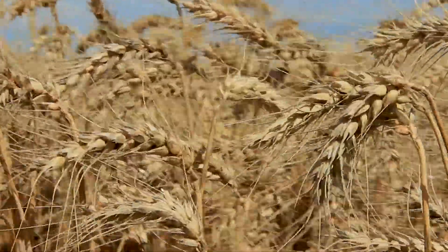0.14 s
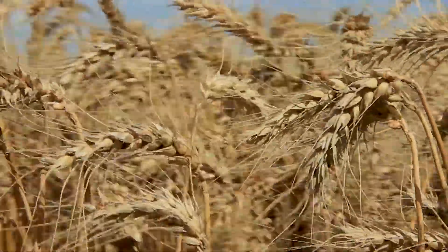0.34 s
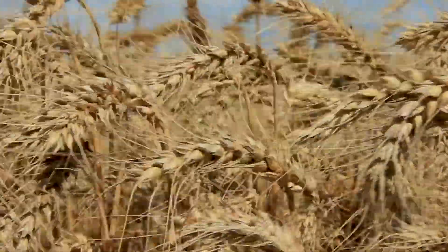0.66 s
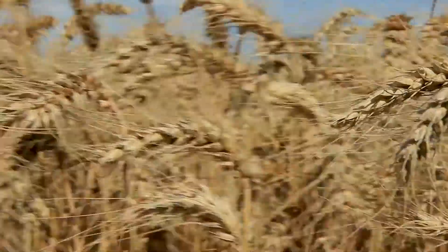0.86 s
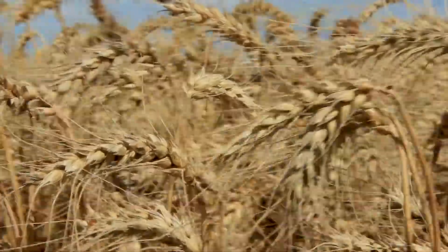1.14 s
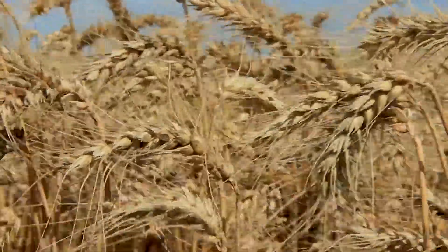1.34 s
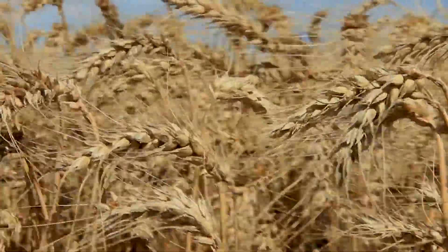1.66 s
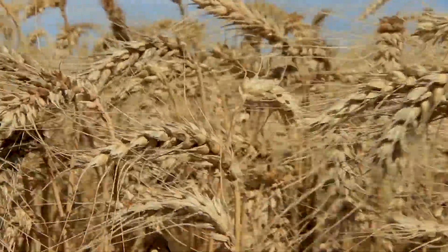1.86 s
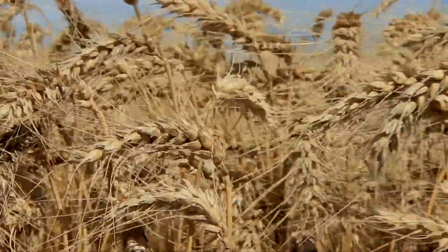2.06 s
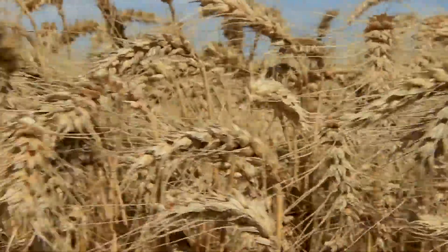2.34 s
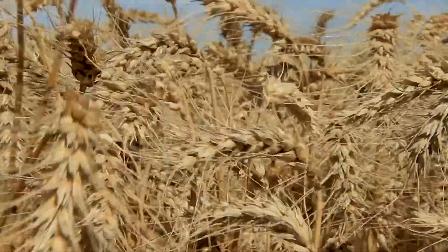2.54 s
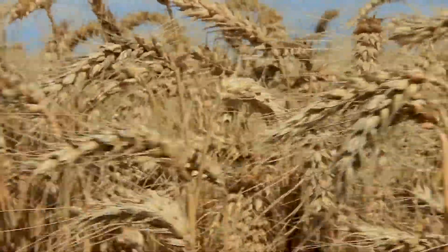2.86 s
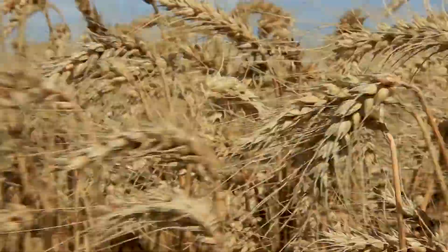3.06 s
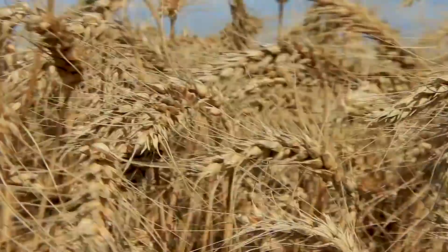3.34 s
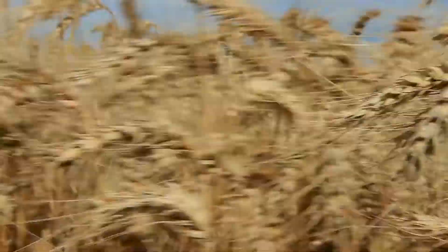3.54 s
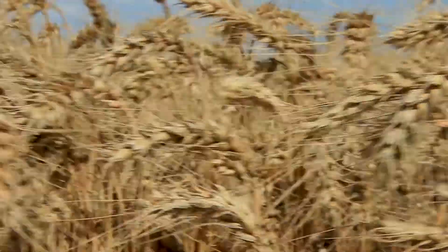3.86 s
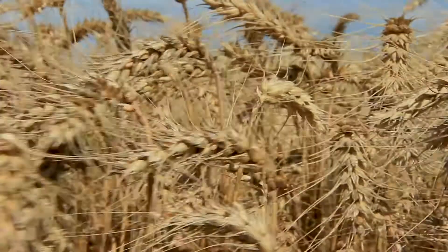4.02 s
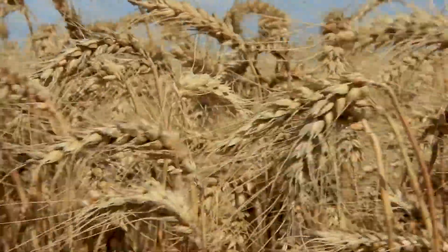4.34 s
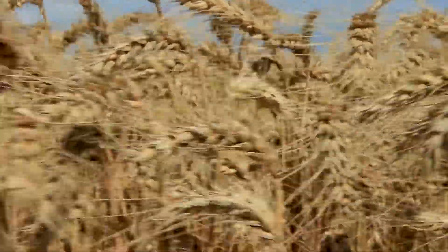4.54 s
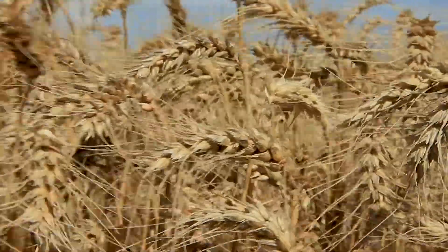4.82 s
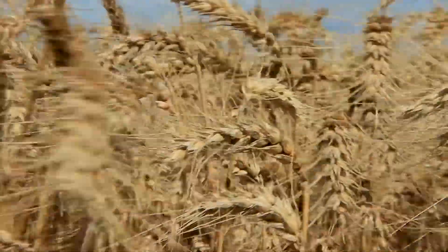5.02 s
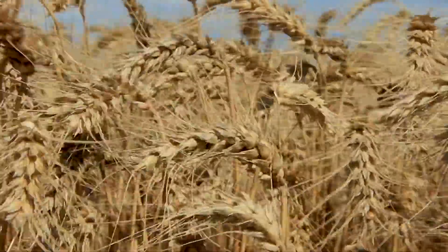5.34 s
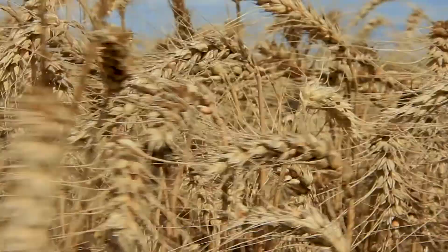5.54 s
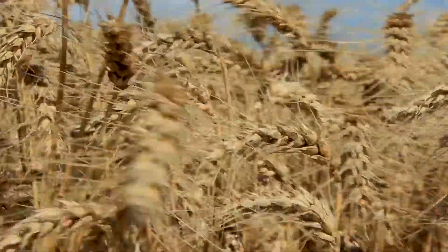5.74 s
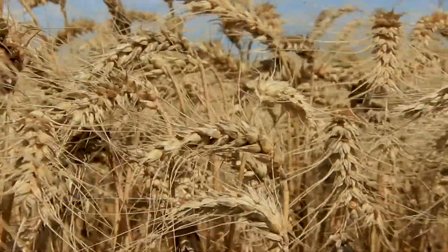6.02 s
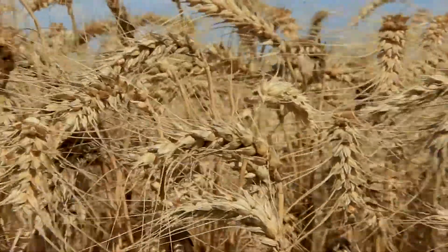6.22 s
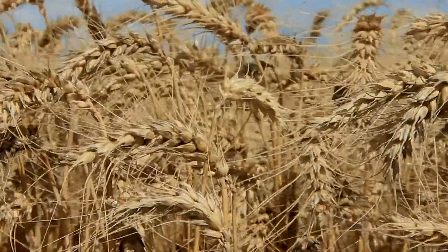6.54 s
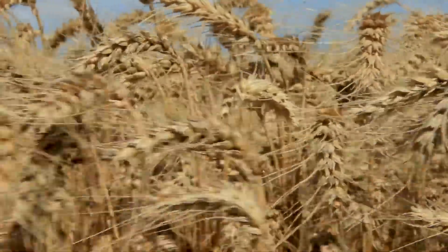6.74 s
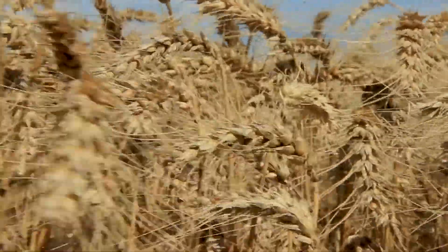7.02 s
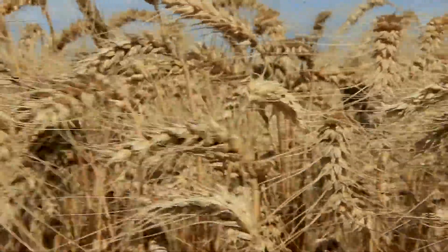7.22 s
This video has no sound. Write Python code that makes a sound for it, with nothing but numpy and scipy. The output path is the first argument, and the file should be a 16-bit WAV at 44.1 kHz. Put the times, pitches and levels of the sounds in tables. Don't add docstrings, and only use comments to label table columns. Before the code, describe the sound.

Bright, fine hiss of countless dry wheat awns swells and fades with gusts above a lumpy low rumble of wind on the microphone.

```python
import sys
import numpy as np
from scipy import signal
from scipy.fft import rfft, irfft, next_fast_len
from scipy.io import wavfile
from scipy.ndimage import uniform_filter1d, map_coordinates

SR = 44100
rng = np.random.default_rng(int(sys.argv[2]) if len(sys.argv) > 2 else 0)


def ratio_of_db(decibels):
    return 10 ** (np.asarray(decibels, float) / 20)


def transcribe(signal):
    frames = np.atleast_2d(signal).T
    limited = np.clip(frames, -1, 1)
    pcm = np.round(limited * 32767).astype(np.int16)
    wavfile.write(sys.argv[1], SR, pcm)


N = 325281


def unit(x):
    return x / np.sqrt(np.mean(x ** 2) + 1e-20)


def curves(rows):
    s, *cols = np.transpose(rows)
    return [np.interp(np.arange(N) / SR, s, c) for c in cols]


def wobble(rate, channels=1):
    at = [np.arange(N) * rate / SR]
    return np.array([map_coordinates(row, at) for row in rng.standard_normal((channels, N // 100))])


def bells(s, half, peaks, edge):
    t = np.arange(0, N, 64) / SR
    shapes = np.exp(-np.abs((t[:, None] - s) / half) ** edge)
    return np.interp(np.arange(N) / SR, t, shapes @ peaks)


def panned(lr_db):
    return ratio_of_db(np.array([lr_db / 2, -lr_db / 2]))


def turbulence(patchy_db, ticks, spread_db, share):
    z = signal.stft(rng.standard_normal((3, N + 512)), nperseg=512)[2]
    field = uniform_filter1d(rng.standard_normal(z.shape[1:]), size=8, axis=0)
    field = uniform_filter1d(field, size=10, axis=1)
    noise = signal.istft(z * ratio_of_db(patchy_db * unit(field)), nperseg=512)[1][:, :N]
    sizes = ratio_of_db(spread_db * rng.exponential(size=(3, N))) * rng.standard_normal((3, N))
    grains = sizes * (rng.random((3, N)) < ticks / SR)
    share = np.clip(share, 0, 1)
    return np.sqrt(1 - share) * noise / np.std(noise) + np.sqrt(share) * grains / np.std(grains)


def at_ports(drive, colour):
    m = next_fast_len(N + 8192)
    f, *cols = np.transpose(colour)
    log_hz = np.log(np.fft.rfftfreq(m, 1 / SR) + 1)
    db, alike, lead, lr_db = (np.interp(log_hz, np.log(f), c) for c in cols)
    alike = np.clip(alike, 0, 1)
    z = rfft(drive, m)
    shared = z[0] * np.exp(.5j * np.array([lead, -lead]))
    pair = np.sqrt(alike) * shared + np.sqrt(1 - alike) * z[1:]
    return unit(irfft(pair * ratio_of_db(db) * panned(lr_db), m)[:, :N])


def evened(pair, seconds):
    power = np.mean(pair ** 2, 0)
    for _ in range(2):
        power = uniform_filter1d(power, int(seconds * SR))
    return unit(pair / np.sqrt(np.abs(power) + 1e-4))


def pings(rows, rise_cycles, fall_cycles):
    out, t = np.zeros((2, N + SR)), np.arange(-SR // 20, SR // 20) / SR
    for s, db, hz, lr_db, lead in rows:
        shape = np.exp(-(t * hz / np.where(t < 0, rise_cycles, fall_cycles)) ** 2)
        wave = np.cos(2 * np.pi * hz * t + np.array([[lead / 2], [-lead / 2]]))
        out[:, round(s * SR):][:, :len(t)] += ratio_of_db(db) * shape * wave * panned(lr_db)[:, None]
    return out[:, SR // 20:][:, :N]


# [t/s, level/dB, brightness of the nearest ears/dB, left-right/dB]
GUST_CURVE = [(0, -31, 4, 1.5), (.13, -30.5, 2, 1.5), (.5, -27, 0, 2.5), (1.0, -30.5, -1, 2),
              (1.23, -32.5, -2, 1.5), (1.38, -35.5, -2.5, 3), (1.97, -36.5, 1, 3.5), (2.3, -34.5, 1.5, 0),
              (2.62, -38, -1, 6), (3.3, -31.5, -2.5, 4), (3.7, -31.5, -1.5, 3), (4.25, -34, -4.5, 2),
              (5.0, -31.5, -2, 3.5), (5.4, -30, 4, 0.5), (5.7, -33, 2, 3), (6.3, -36.5, -3.5, 0.5),
              (6.8, -40.5, -5, 3.5), (7.37, -43, 0, 5)]
USUAL_GUST_DB = -33.5


def gusts():
    return curves(GUST_CURVE)


# [t/s, level over the usual/dB]
AIR_SPEED = [(0, 2), (.55, 1.5), (1.0, 0.5), (1.4, .5), (1.9, 1.5), (2.4, 0.5), (2.9, 2), (3.4, -1),
             (3.9, 1.5), (4.4, 0), (5.1, 3), (5.45, 2.5), (5.75, 1), (6.2, -1.5), (6.6, -2.5), (7.0, -3.5),
             (7.37, -4.5)]


def air_speed():
    return curves(AIR_SPEED)[0]


# [t/s, swell level/dB, half length/s]
EAR_SWAYS = [
    (1.028, 0.5, .06),
    (1.6, 0.2, .1),
    (2.13, 2.5, 0.082),
    (3.38, 0.5, 0.11),
    (3.663, 1, 0.079),
    (4.63, 1.6, .15),
    (5.19, 2.5, .1),
    (5.92, 2.5, 0.14),
    (6.213, 1.5, 0.13),
]


def sways():
    s, db, half = np.transpose(EAR_SWAYS)
    return bells(s, half, db, edge=2.4)


# [t/s, peak level/dB, half length/s, deepest eddies over peak/dB]
AIR_PUFFS = [(0.087, -33.5, 0.11, -7), (0.443, -35, 0.13, -14), (0.701, -29, 0.027, -3.5),
             (0.81, -32, 0.027, -3.5), (0.92, -39, 0.058, -15), (1.142, -34, 0.095, -7),
             (1.605, -29, 0.079, -11), (1.824, -39, 0.084, -18), (2.14, -31, 0.068, -9),
             (2.244, -32, 0.025, -10), (2.382, -36.5, 0.026, -2.5), (2.77, -34.5, 0.067, -6.5),
             (2.907, -32.5, 0.051, -5.5), (3.057, -35, 0.049, -16), (3.31, -32, 0.064, -12),
             (3.43, -28, 0.04, -8), (3.71, -34, 0.13, -14), (4.128, -34, 0.041, -21),
             (4.27, -34, 0.096, -10), (4.58, -30.5, 0.089, -19), (4.844, -33, 0.081, -15),
             (5.186, -31.5, 0.12, -13), (5.54, -29, 0.087, -6), (5.8, -26, 0.042, -17),
             (5.908, -32.5, 0.048, -13), (6.062, -38.5, 0.025, -5.5), (6.265, -34, 0.078, -17),
             (6.54, -34.5, 0.09, -7.5), (7.04, -35.5, 0.07, -7.5), (7.28, -32.5, 0.077, -15)]


def puffs(speed_db):
    s, db, half, deep_db = np.transpose(AIR_PUFFS)
    lull_db = -38.5 + 0.18 * speed_db
    levels = []
    for peak, low in ((db, lull_db), (db + deep_db, lull_db - 12)):
        power = bells(s, half, ratio_of_db(2 * peak), edge=1.9) + ratio_of_db(2 * low)
        levels.append(10 * np.log10(power))
    return levels


# [f/Hz, level/dB, left-right likeness/0-1, left lead/rad, left-right/dB]
DEEP_COLOUR = [(25, -60, .2, 2.5, 0), (60.6, -69, .4, 2.6, -1), (85, -18, 0.23, 1.1, -8),
               (114.4, 1.5, 0.72, 1.7, 0), (156, 2, 0.64, 1.73, 2.5), (196, -16, 1, 0.84, -23),
               (300, -46, 0.89, 1.7, 0)]
BODY_COLOUR = [(80, -54, .5, 5.6, -8), (150, -8.5, 0.6, 2.24, -10), (189.6, -0.5, 0.28, 4.5, 2.5),
               (215, 1, 0.63, 3.52, -3.5), (281, 0.5, 0.2, 5.5, -2), (300, -0.5, 0.57, 3.55, 2.5),
               (387, -4, 0, 3.6, -4), (479, -20.5, 0.45, 3.2, 2), (700, -50, 0.07, 3.4, -5)]
FLUTTER_COLOUR = [(250, -40, .3, 4, 0), (372, -7, 0.31, 4.6, 1), (460, 0, 0.65, 3.05, 0.28),
                  (520, -2, 0.2, 4.2, 0.33), (653, -5.5, 0.81, 3.3, -0.86), (773, -10.5, 0.78, 2.97, -1.8),
                  (920, -24, 0.27, 2.8, -1.1), (1400, -39, .4, 3.3, 0)]


def rumble(lumps, speed_db, level_db, deep_db, puff_db):
    stream = ratio_of_db(0.39 * lumps) * turbulence(patchy_db=0.94, ticks=220, spread_db=3.5, share=0.16)
    deep = evened(at_ports(stream, DEEP_COLOUR), 0.14) * ratio_of_db(deep_db - 1.4)
    body = evened(at_ports(stream, BODY_COLOUR), 0.058) * ratio_of_db(level_db - 0.95)
    flutter = evened(at_ports(stream, FLUTTER_COLOUR), 0.053) * ratio_of_db(-38.5 + 0.66 * puff_db + speed_db)
    edge = signal.sosfiltfilt(signal.butter(2, 650, "high", fs=SR, output="sos"), flutter)
    flutter = flutter + edge * (ratio_of_db(0.67 * speed_db) - 1)
    side_db = 3.2 * wobble(5)[0]
    return (deep + body + flutter) * ratio_of_db(0.95 * lumps) * panned(side_db)


# [f/Hz, level/dB, left-right likeness/0-1, left lead/rad, left-right/dB]
RUSH_COLOUR = [(398, -19, .3, 2.4, 0), (673, 2, 0.23, 2.1, 4.5), (980, -1.5, 0.39, 0.87, -3),
               (1360, -6, 0.54, .5, 1), (1730, -10.5, 0.34, .5, -5.5), (2660, -15, 0.93, 0.46, 4),
               (5000, -55, .4, .5, 0)]


def rush(lumps, speed_db, puff_db):
    gust_db = gusts()[0] - USUAL_GUST_DB
    eddies = at_ports(turbulence(patchy_db=-0.63, ticks=1500, spread_db=-3.5, share=0.078), RUSH_COLOUR)
    rush_db = -44 + 0.062 * puff_db + 0.49 * speed_db + 0.3 * gust_db + 0.36 * sways()
    side_db = -1.7 + 1.6 * wobble(2.96)[0]
    return evened(eddies, 0.42) * ratio_of_db(rush_db + 0.15 * lumps) * panned(side_db)


# [t/s, peak level/dB, f/Hz, left-right/dB, left lead/rad]
SLOW_HEAVES = [
    (.17, -35, 115, -2, 1.7),
    (1.68, -32, 112, -2, 1.7),
    (3.73, -34, 120, -2, 1.7),
    (4.28, -32, 116, -2, 1.7),
    (5.1, -32, 118, -2, 1.7),
    (5.76, -29.5, 113, -2, 1.7),
]


def heaves():
    return pings(SLOW_HEAVES, rise_cycles=2.6, fall_cycles=3.3)


# [t/s, peak level/dB, f/Hz, left-right/dB, left lead/rad]
PORT_THUMPS = [(0.101, -16, 260, -5, 5.6), (0.683, -17, 343, 7, 2.7), (0.955, -22, 250, 9, 2.4),
               (1.8, -16, 216, -5, 2.9), (3.44, -16.5, 215, 5, 4.4), (4.794, -16.5, 246, -0.5, 4.3),
               (5.563, -14, 216, -4, 4.6), (6.052, -22, 204, 2, 4.7), (6.78, -26, 215, 5, 2.7),
               (7.002, -18, 328, -3, 3.4), (7.336, -17.5, 324, -3, 8)]


def thumps():
    return ratio_of_db(-5.0) * pings(PORT_THUMPS, rise_cycles=1.0, fall_cycles=0.99)


def buffet():
    speed_db = air_speed()
    level_db, deep_db = puffs(speed_db)
    puff_db = level_db + 34
    lumps = wobble(26)[0]
    large = rumble(lumps, speed_db, level_db, deep_db, puff_db)
    return large + rush(lumps, speed_db, puff_db) + thumps() + heaves()


# [f/Hz, level/dB, left-right likeness/0-1, left lead/rad, left-right/dB]
STALK_COLOUR = [(497, -16, 0.84, .5, 0), (1280, -1.5, 0.49, 0.37, 0), (2100, -3.5, 0.55, 0.41, 1),
                (3230, 1.5, 0.71, 0.43, 0.89), (4130, -0.5, 1, 0.44, 0), (5400, -4, 0.16, 2.4, 0.18),
                (8070, 4.5, 0.18, 6.8, 0.55), (13700, -24, .2, 7.1, 0)]
HISS_DB = 4


def stalks(gust_db, near_db, wave):
    rustle = at_ports(turbulence(patchy_db=-0.54, ticks=5000, spread_db=1.5, share=0.39), STALK_COLOUR)
    stalk_db = USUAL_GUST_DB + HISS_DB - 11.5 + 0.96 * (gust_db - USUAL_GUST_DB) + 1.07 * sways()
    return rustle * ratio_of_db(stalk_db + 0.3 * near_db + 0.7 * wave + 0.5 * wobble(22))


# [t/s, peak level/dB, f/Hz, left-right/dB, left lead/rad]
HUSK_SNAPS = [
    (7.2913, -30, 8360, 4.0, 0.8),
]


def husk_snap():
    return ratio_of_db(4.0) * pings(HUSK_SNAPS, rise_cycles=4, fall_cycles=11)


# [f/Hz, level/dB, left-right likeness/0-1, left lead/rad, left-right/dB]
TIP_COLOUR = [(7000, -37, .2, 3, 0), (10500, -3, .25, 2, 0), (12500, -7.5, .28, 4.2, -0.076),
              (14000, -2.5, .2, 4.3, -1), (16000, -0.5, .2, 6.4, -1)]


def tips(hiss_db, near_db, wave):
    sizzle = at_ports(turbulence(patchy_db=1.5, ticks=12000, spread_db=2.2, share=.2), TIP_COLOUR)
    return sizzle * ratio_of_db(hiss_db - 2 + near_db + 0.5 * wave + .3 * wobble(20))


# [f/Hz, level/dB, left-right likeness/0-1, left lead/rad, left-right/dB]
AWN_COLOUR = [(2310, -27.5, 0.44, 0.7, 0), (4640, -7.5, 0.032, 3, -0.34), (6460, -6, 0.39, 1.66, 0.56),
              (7720, -3, 0.14, 4.4, 0.59), (9120, 1.5, 0.3, 1.4, 0.6), (10500, 3, 0.21, 2.9, -0.73),
              (12800, 1, 0.4, 5.8, -0.62), (13750, -2.5, .2, 5.4, -0.52), (17000, -16.5, 0.091, 3.2, -1)]


def awns(hiss_db, wave):
    hiss = at_ports(turbulence(patchy_db=0.93, ticks=12000, spread_db=2.7, share=0.23), AWN_COLOUR)
    return hiss * ratio_of_db(hiss_db + 0.38 * wave + 0.34 * wobble(17, channels=2))


def wheat():
    gust_db, near_db, lr_db = gusts()
    hiss_db = gust_db + HISS_DB + sways()
    wave = .5 * wobble(11) + 0.56 * wobble(26) + 0.31 * wobble(70)
    crop = awns(hiss_db, wave) + tips(hiss_db, near_db, wave) + stalks(gust_db, near_db, wave)
    return crop * panned(lr_db) + husk_snap()


def scene():
    return buffet() + wheat()


def low_pass(x):
    return signal.sosfilt(signal.butter(12, 15745, fs=SR, output="sos"), x)


def record(dry):
    low_cut = signal.butter(2, 58, "high", fs=SR, output="sos")
    heard = signal.sosfilt(low_cut, dry)
    ceiling = .46
    heard = heard / (1 + (heard / ceiling) ** 4) ** (1 / 4)
    end_s = 7.3762
    mix = heard * (np.arange(N) < end_s * SR)
    return low_pass(mix)


dry = scene()
out = record(dry)
transcribe(out)
```